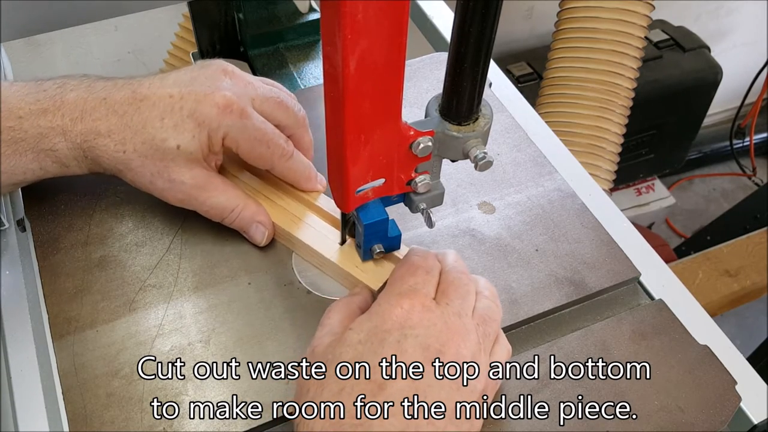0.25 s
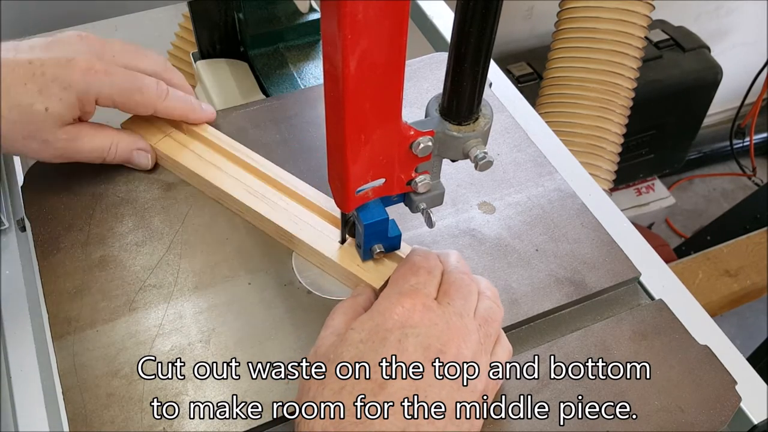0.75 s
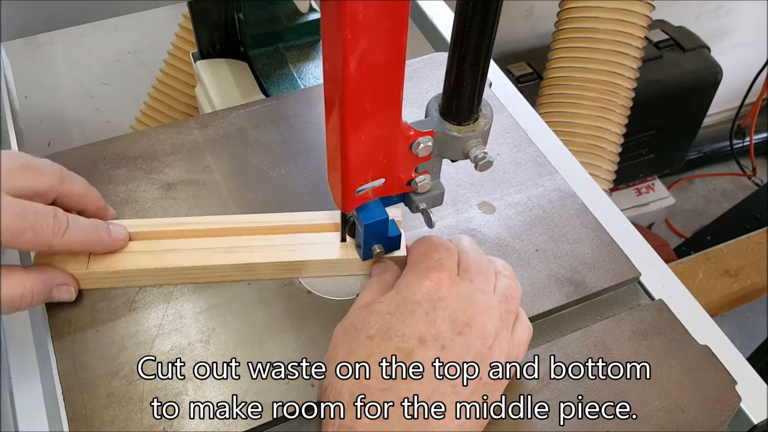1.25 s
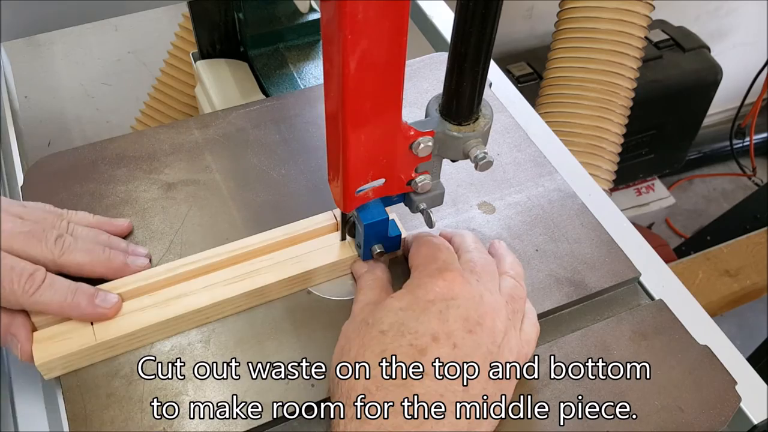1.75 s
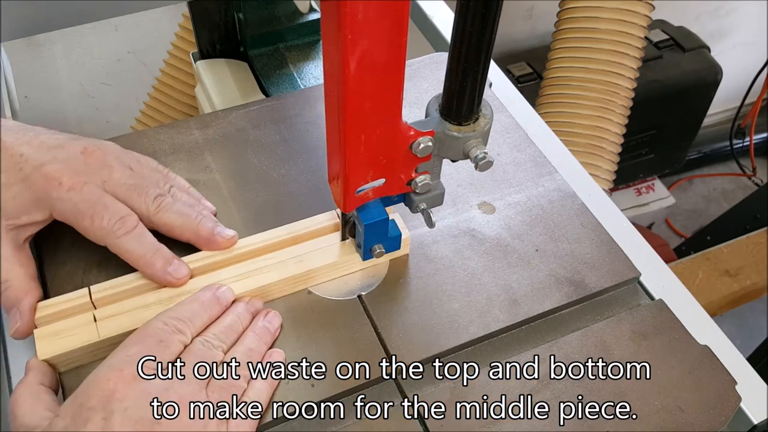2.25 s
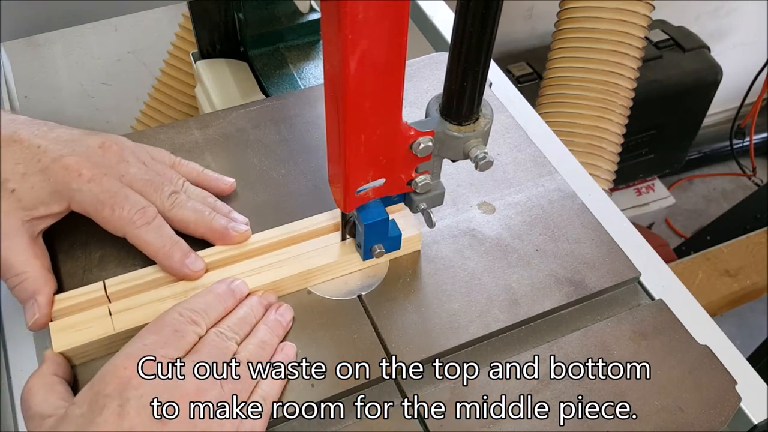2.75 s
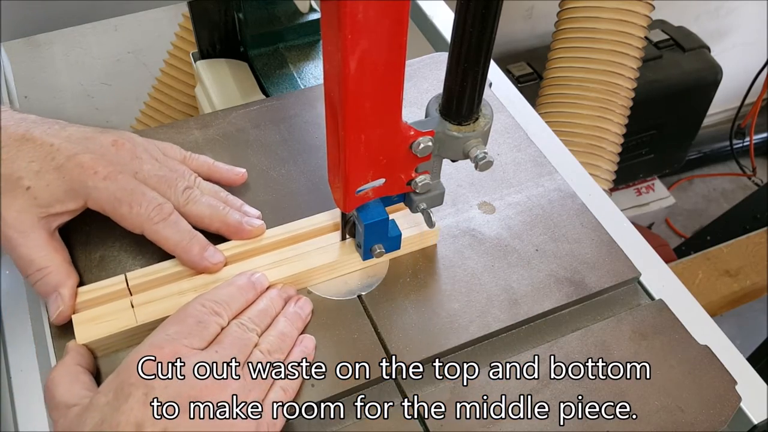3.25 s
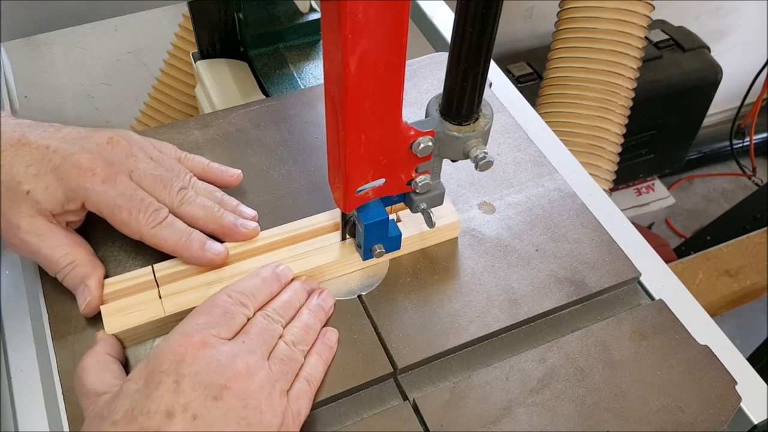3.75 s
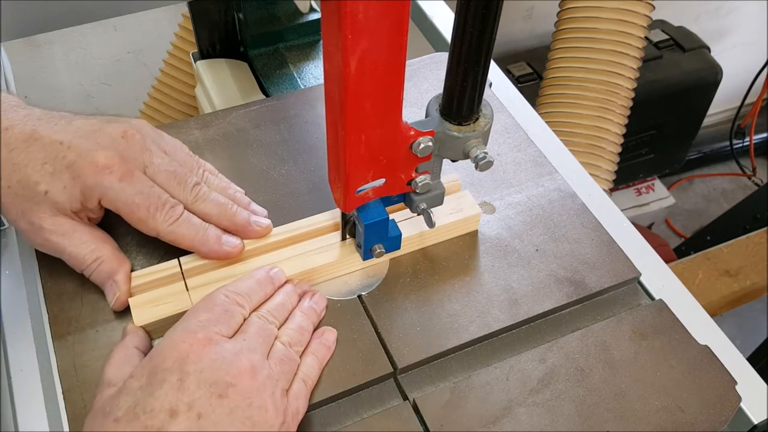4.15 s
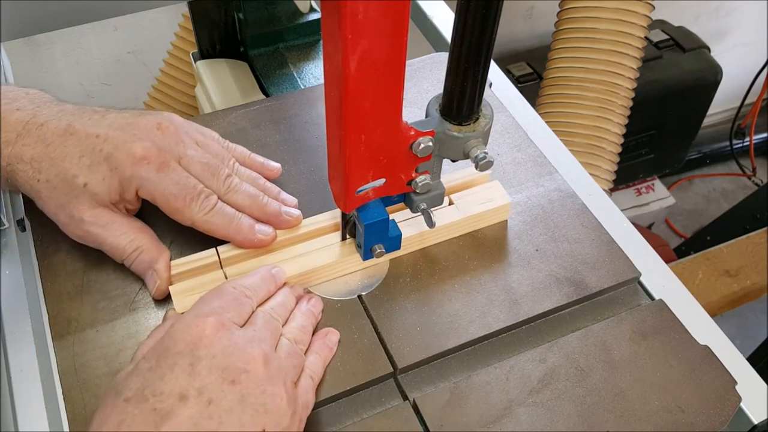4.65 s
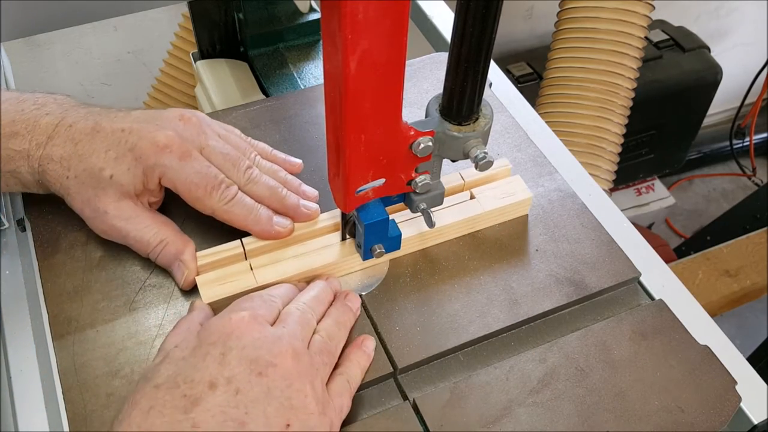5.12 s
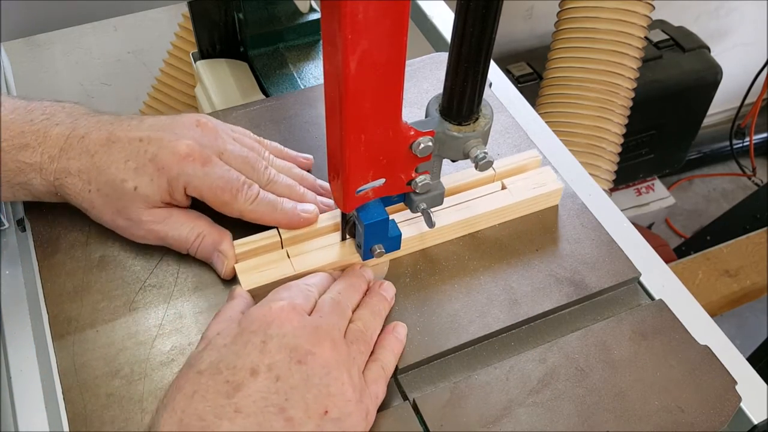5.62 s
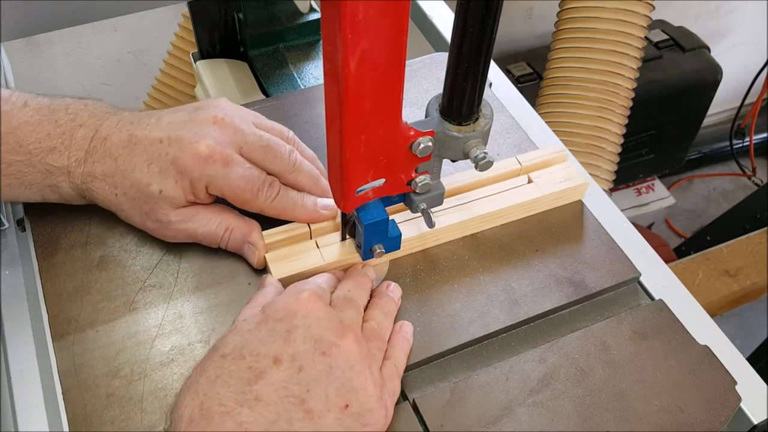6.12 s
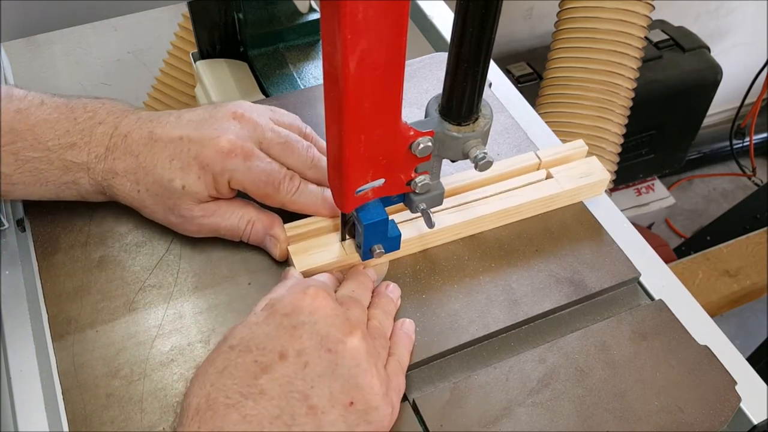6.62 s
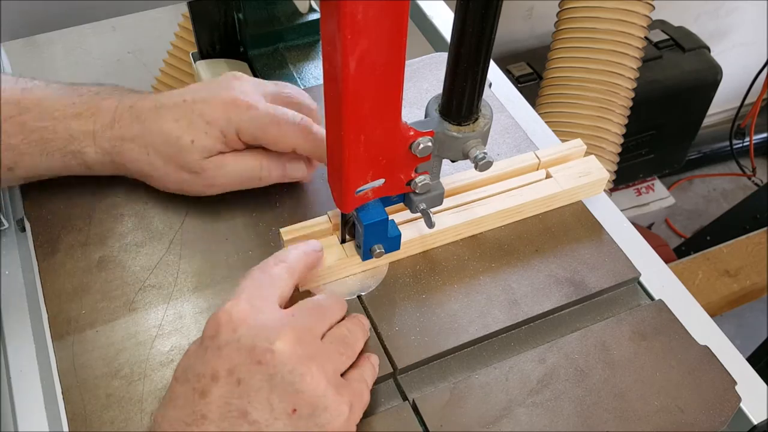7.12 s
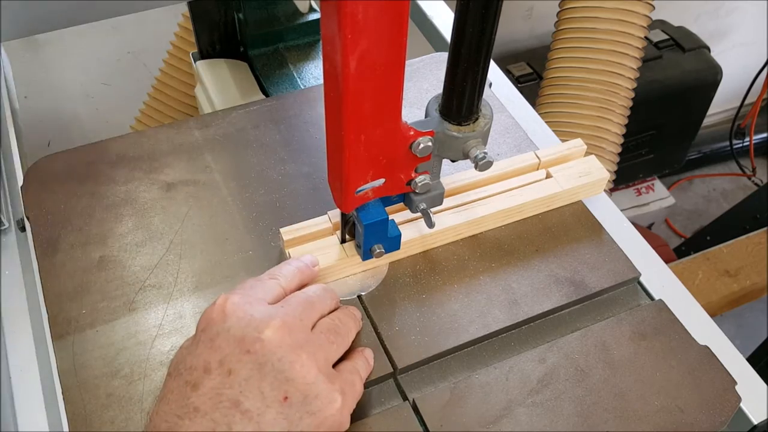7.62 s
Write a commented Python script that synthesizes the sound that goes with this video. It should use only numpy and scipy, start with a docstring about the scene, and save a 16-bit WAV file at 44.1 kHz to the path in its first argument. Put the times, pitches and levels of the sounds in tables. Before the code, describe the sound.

A bandsaw whirs steadily in a small workshop, heard from close by. Short whines and ticks come as a strip of wood is nudged against the blade. A long rasping cut follows, with a thin, throbbing whine and high pulsing squeals where the wood pinches the blade. The rasp and whine stop when the cut ends, and the saw keeps running with a faint metallic ring.

```python
"""A bandsaw whirs in a small workshop, with short whines and ticks as a strip of wood is lined up.
A long rasping cut follows, then the saw runs free. Wheels, belt and air stir the frame throughout.
Wood pressed on the blade makes it whine at multiples of the tooth rate and sets a guide bearing singing.
The teeth tear the fibres, throbbing with the wheels, and the blade squeals where the kerf pinches it."""
import sys
import numpy as np
from scipy import signal
from scipy.fft import rfft, irfft, next_fast_len
from scipy.io import wavfile
from scipy.ndimage import uniform_filter1d

SR = 44100
rng = np.random.default_rng(int(sys.argv[2]) if len(sys.argv) > 2 else 0)


def wav_out(sig):
    """Save sig, one row per channel (or a flat mono array), as 16-bit PCM at SR to the path in sys.argv[1]."""
    wavfile.write(sys.argv[1], SR, np.round(np.clip(np.atleast_2d(sig).T, -1, 1) * 32767).astype(np.int16))


N = 347508
T = np.arange(N) / SR
HZ = np.fft.rfftfreq(2 * next_fast_len(N // 2 + 1), 1 / SR)
TOOTH_HZ = 501.3  # unloaded
MOTOR_HZ, WHEEL_HZ, ROLLER_HZ, BLADE_LOOP_HZ = 29.22, 14.55, 31.57, 2.43  # turning rates
CUT_START_S, CUT_END_S = 2.16, 6.63


def amp(db):
    """Decibels to gain."""
    return np.exp(np.asarray(db) * np.log(10) / 20)


def unit(x):
    """Scale to rms 1."""
    return x / np.sqrt(np.mean(x ** 2) + 1e-20)


def curve(rows):
    """(s, value) rows read at every sample."""
    return np.interp(T, *np.transpose(rows))


def spectrum(rows):
    """(Hz, value) rows read on a log frequency axis."""
    hz, value = np.transpose(rows)
    return np.interp(np.log(HZ + 1), np.log(hz + 1), value)


def bell(hz, width_hz):
    """Resonance curve, peak 1."""
    return 1 / (1 + (2 * (HZ - hz) / width_hz) ** 2)


def stretch(slow):
    """Spread a slowly sampled signal over the scene."""
    return np.interp(T, np.linspace(0, T[-1], len(slow)), slow)


def drift(rate_hz, count=16384):
    """Random wander up to about rate_hz, rms 1."""
    hz = np.fft.rfftfreq(count, T[-1] / count)
    slow = irfft(rfft(rng.standard_normal(count)) * np.exp(-(hz / rate_hz) ** 2))
    return stretch(unit(slow))


def cycle(hz):
    """Swing of a part turning at slightly uneven speed."""
    return np.sin(2 * np.pi * (hz * T + 0.1 * drift(2.3)))


def ripple(grain_hz):
    """Random unevenness over frequency, rms 1."""
    knots = np.arange(0, SR, grain_hz)
    return unit(np.interp(HZ, knots, rng.standard_normal(len(knots))))


def swell(start_s, end_s, attack_s, release_s):
    """Linear rise, hold until end_s, exponential decay."""
    return np.clip((T - start_s) / attack_s, 0, 1) * np.exp(-np.clip((T - end_s) / release_s, 0, 20))


def contacts(rows, attack_s, release_s):
    """Gain of a series of touches; the firmest counts."""
    return np.max([amp(db) * swell(start, end, attack_s, release_s) for start, end, db in rows], axis=0)


def noise(gain):
    """Coloured stereo noise, rms 1; table reflections turn the treble's phase between channels."""
    # Each row: frequency in Hz, left-right coherence.
    coherence = [(30, .5), (80, 0.4), (160, 0.87), (400, 0.87), (700, 0.94), (1200, 0.87), (2500, 0.53),
                 (5000, 0.55), (9000, 0.5), (14000, 0.5)]
    # Each row: frequency in Hz, left minus right in dB.
    balance = [(60, 0.5), (110, 0), (200, -0.5), (380, -0.5), (700, -1), (1290, 3.5), (2380, -1.5),
               (4400, 0), (8120, 1), (15000, 1)]
    # Each row: frequency in Hz, left-right phase spread in radians.
    phase_spread = [(600, .05), (1500, .4), (2500, 1.), (5000, 1.1), (9000, 1.7), (14000, 2.1)]
    common, separate = rng.standard_normal((2, 2 * len(HZ))).view(complex)
    same, pan = spectrum(coherence), amp(spectrum(balance) / 2)
    turn = np.exp(1j * spectrum(phase_spread) * ripple(grain_hz=256.1))
    right = same * common * turn + np.sqrt(1 - same ** 2) * separate
    return unit(irfft(gain * np.array([common * pan, right / pan]))[:, :N])


def ringing(modes):
    """Noise in a few resonances (Hz, width Hz, relative dB), rms 1."""
    return noise(sum(amp(db) * bell(hz, width) for hz, width, db in modes))


def body(shape, modes):
    """Broad spectrum with resonances and notches; the thin steel's small modes roughen the treble."""
    # Table echo cancels the direct sound. Each row: centre in Hz, width in Hz, gain in dB.
    notches = [(510, 25, -3), (3240, 130, -2), (3850, 120, -2), (5130, 170, -1.5), (5920, 130, -2),
               (6240, 180, -2.8), (6740, 110, -2.5), (7080, 160, -3.7), (8190, 100, -2), (9740, 170, -3)]
    small_modes_db = 1.3 * ripple(grain_hz=50) * np.clip(HZ / 2000 - .6, 0, 1)
    modes_db = sum(db * bell(hz, width) for hz, width, db in modes + notches)
    return amp(spectrum(shape) + small_modes_db + modes_db)


def tone(hz, scatter, width_hz, lead_rad=0., left_db=0., count=4096):
    """Stereo tone plus a noise halo per channel; scatter is the halo-to-tone ratio."""
    phase = 2 * np.pi * (np.cumsum(hz * np.ones(N)) / SR + rng.random())
    cos, sin = np.cos(phase), np.sin(phase)
    offset_hz = np.fft.fftfreq(count, T[-1] / count)
    white = rng.standard_normal((2, count, 2)) @ [1, 1j]
    halo = np.fft.ifft(np.fft.fft(white) / (1 + (offset_hz / width_hz) ** 2))
    sides = np.array([[.5], [-.5]])
    envelope = (np.exp(1j * lead_rad * sides) + scatter * halo / halo.std()) * amp(left_db * sides)
    envelope /= np.sqrt(np.mean(abs(envelope) ** 2) / 2)
    return np.array([stretch(side.real) * cos - stretch(side.imag) * sin for side in envelope])


def whir(load, press):
    """Wheels, belt and air stir the frame; load and wood held on the blade damp it."""
    # Each row: frequency in Hz, relative density in dB.
    shape = [(20, -23), (65, -47), (120, -33), (170, -18.5), (300, -17), (600, -13.5), (1000, 0), (1230, 0),
             (1345, -4), (1420, -1), (1510, -13.5), (1660, -9), (4400, -10.5), (6200, -13), (10300, -14),
             (11400, -17.5), (15600, -20)]
    # Frame, table and blade resonances. Each row: centre in Hz, width in Hz, boost in dB.
    modes = [(235, 10, 6.6), (326, 70, 10.9), (453, 66, 12), (541, 30, 9), (611, 50, 14), (679, 67, 10.2),
             (759, 23, 7.8), (822, 30, 11.6), (950, 45, 5.5), (1040, 40, 2.5), (1150, 35, 3.6),
             (1635, 35, 3.5), (1921, 14, 5), (2172, 66, 11.5), (2272, 44, 8.6), (2406, 60, 7.5),
             (2565, 40, 2.5), (2633, 18, 6.5), (2825, 10, 11.3), (3015, 66, 4.4), (3565, 130, 3.5),
             (4040, 150, 4), (4400, 160, 3), (4680, 220, 3.5), (5619, 149, 7), (6490, 178, 7.3),
             (6894, 58, 4.7), (7300, 90, 2), (8436, 64, 4.1)]
    held = np.clip(press / amp(-43.5), 0, 1)
    return noise(body(shape, modes)) * amp(-43 - 1.7 * load - held + 0.66 * drift(27))


def motor_hum(gain_db=1.9):
    """Faint steady motor tones."""
    # Each row: frequency in Hz, relative level in dB.
    tones = [(1412, -61), (1441, -63.5), (2153, -70), (2824, -71), (2632, -75)]
    return sum(amp(db + gain_db) * tone(hz, scatter=0.98, width_hz=2.4) for hz, db in tones)


def free_ring():
    """The blade rings while it runs free."""
    # Each row: centre in Hz, width in Hz, relative level in dB.
    modes = [(2170, 70, -6), (2285, 50, -12), (2410, 70, -12), (4400, 350, -8), (5635, 90, -6.5),
             (9435, 60, 0), (9920, 50, -5), (10410, 90, -3), (12450, 140, -7)]
    # Each row: time in seconds, level in dB.
    level = [(0, -54), (.55, -68.5), (.7, -56), (1, -62), (1.1, -65), (6.6, -78), (6.72, -53.5),
             (7.55, -52.5), (7.7, -59), (7.88, -60)]
    return ringing(modes) * amp(curve(level))


def nudges():
    """Short pushes of the blade's back onto its guide bearing."""
    # Each row: start in seconds, end in seconds, level in dB.
    pushes = [(-.02, .05, -60.5), (.1, .35, -60), (.54, .62, -61), (1.02, 1.06, -56), (1.16, 1.23, -53.5),
              (1.31, 1.35, -60.5), (1.74, 1.83, -55.5), (1.86, 1.93, -54.5), (1.97, 2.08, -57)]
    return contacts(pushes, attack_s=0.012, release_s=0.045)


def bearing(speed, roller, nudge, load, sing_hz=4563, race_hz=190, cage_hz=102):
    """The guide bearing sings, throbbing as it rolls; nudges bend it flat, load damps its octave."""
    # During the cut. Each row: time in seconds, relative dB of harmonic 1, relative dB of harmonic 3.
    singing = [(2.2, -54.5, -55), (2.75, -52, -53), (3.5, -53.5, -51), (4.3, -52.5, -47.5),
               (5.0, -57, -50.5), (5.4, -56, -50.5), (5.75, -51.5, -50), (6.1, -53.5, -49.5),
               (6.62, -64, -50.5)]
    pitch_hz = sing_hz * speed * (1 + .0003 * drift(30) - .004 * nudge / nudge.max())
    sway_hz = 9 * cycle(WHEEL_HZ) + 8 * cycle(ROLLER_HZ) + 6 * drift(70)
    cutting = swell(CUT_START_S, CUT_END_S, attack_s=0.056, release_s=0.044)
    first, third = (amp(curve(np.array(singing)[:, [0, k]])) * cutting for k in (1, 2))
    octave = first * amp(-7.5 * load)
    rough = nudge * amp(2 * drift(83))
    harmonics = [(first, .5, 1.5, 3.6), (octave, -3, -2, 2), (third, -.5, -4, 1.5)]
    levels = [(amp(cut_db) * steady + amp(nudge_db) * rough) * amp(throb_db * roller)
              for steady, cut_db, nudge_db, throb_db in harmonics]
    rattle = amp(-7.5 + 2.5 * drift(120)) * levels[0] * ringing([(4480, 300, 0)])
    song = sum(level * tone(k * pitch_hz + sway_hz / k, scatter=.3, width_hz=18 + 6 * k,
                            lead_rad=.45 * k, left_db=2.2 - 2 * k) for k, level in enumerate(levels, 1))
    flutter = (1 - load) * cycle(race_hz) + load * cycle(cage_hz)
    return (rattle + song) * (1 + 0.13 * flutter)


def wood_feed(nudge, idle_db=-60.5):
    """Drive of the kerf sounds: power sum of the cut, the nudges and an idle floor."""
    # Each row: time in seconds, feed level in dB.
    level = [(2.2, -55), (2.38, -53), (2.48, -49.5), (2.75, -48), (3.4, -49.5), (4.3, -49), (5.5, -49.5),
             (6.2, -51), (6.62, -52.5)]
    cutting = amp(curve(level)) * swell(CUT_START_S, CUT_END_S, attack_s=0.082, release_s=0.038)
    return np.sqrt(cutting ** 2 + nudge ** 2 + amp(idle_db) ** 2)


def rasp(feed, roller, wheel, loop):
    """Teeth catch on the wood and tear its fibres; uneven teeth come round once a blade loop."""
    # Single catches. Each row: start in seconds, level in dB, decay in seconds.
    snags = [(.01, -48, 0.024), (1.04, -55.5, 0.047), (1.168, -59, 0.036), (1.738, -45, 0.016),
             (6.622, -48, 0.04), (6.735, -47, 0.012)]
    # Each row: frequency in Hz, relative density in dB.
    shape = [(100, -48), (1500, -4), (3200, -4), (4000, 1), (4850, 3.5), (5200, 1), (6100, -1.5),
             (7400, -2), (8150, 0), (8700, -.5), (9800, -2), (11600, -4.5), (12300, -2), (13100, 3),
             (13700, 2.5), (14400, -7), (15600, -8)]
    # Blade resonances in the kerf. Each row: centre in Hz, width in Hz, boost in dB.
    modes = [(2600, 130, 3), (3460, 160, 3.5), (4165, 60, 6), (4255, 55, 7), (4410, 60, 5.5), (4720, 80, 8),
             (4870, 50, 2.5), (5520, 130, 5.5), (5700, 90, 5), (6560, 130, 5), (8050, 80, 7),
             (8790, 130, 5), (9465, 130, 6), (10420, 160, 5), (13400, 90, 5)]
    catches = sum(amp(db) * swell(start, start, 0.0084, decay) for start, db, decay in snags)
    throb_db = -0.13 * roller + 0.25 * wheel + 0.25 * cycle(2 * MOTOR_HZ) + 0.59 * loop
    tearing = amp(4.5 + throb_db + 1.36 * drift(240))
    return noise(body(shape, modes)) * (feed * tearing + catches)


def teeth(speed, load, press, graze=0.39):
    """Teeth tick past the wood and the rubbed blade flank rings, until the wood is through."""
    # Each row: tooth-rate multiple, relative dB at first touch, with the strip turned, in a tight kerf.
    harmonics = [(3, -58, -58, -55), (6, -73, -66, -63.5), (8, -71, -77, -65), (11, -59, -77, -68),
                 (16, -58, -60.5, -75), (19, -80, -64, -90), (20, -58, -84, -83), (21, -58, -57.5, -73),
                 (22, -85, -73, -54), (25, -63, -61, -77), (27, -62, -83, -69)]
    # Each row: time in seconds, kerf tightness from 0 to 1.
    tightness = [(2.3, 0), (2.55, .2), (2.8, .65), (4.1, .8), (4.45, 1), (5.6, 1), (5.9, .72), (6.25, .68),
                 (6.45, .3)]
    # Each row: centre in Hz, width in Hz, relative level in dB.
    flank_modes = [(5500, 70, -4), (5640, 90, -3), (6560, 110, 0), (6870, 50, -3), (13060, 100, -7)]
    turned, grip = np.clip((T - .7) / 0.4, 0, 1), curve(tightness)
    firmness = np.clip(press / amp(-44) + load, 0, 1)
    touch = (graze + (1 - graze) * firmness) * swell(0, CUT_END_S, attack_s=0.07, release_s=0.037)
    out = ringing(flank_modes) * amp(-56.5 - 26 * load)
    for k, first_db, turned_db, tight_db in harmonics:
        brush_db = first_db + (turned_db - first_db) * turned
        level = amp(brush_db + (tight_db - brush_db) * grip - 1.5)
        out += level * tone(k * TOOTH_HZ * speed, scatter=0.85, width_hz=35)
    return out * touch


def side_pressure(linger_s=.105):
    """Hands lean the wood on the blade: short touches, and a long push that just outlasts the cut."""
    # Each row: start in seconds, end in seconds, level in dB.
    leans = [(.03, .13, -50), (.11, .57, -46.5), (1.08, 1.27, -46), (1.32, 1.59, -46), (1.68, 1.79, -52),
             (1.77, 1.87, -46), (1.86, 1.97, -44.5), (2.06, 2.18, -45.5), (7.19, 7.26, -53)]
    # Each row: time in seconds, level in dB.
    push = [(2.3, -44), (2.5, -46), (2.9, -47.5), (3.75, -47.5), (4.47, -50), (4.93, -46.5), (5.2, -49.5),
            (5.88, -47), (6.02, -50.5), (6.35, -48), (6.7, -47)]
    cutting = amp(curve(push)) * swell(CUT_START_S, CUT_END_S + linger_s, attack_s=0.12, release_s=0.04)
    leaning = contacts(leans, attack_s=0.05, release_s=0.042)
    return np.maximum(leaning, cutting) * amp(0.36 * drift(2.5))


def whine(speed, press):
    """The pressed blade whines at the tooth rate and its octave; its guide hums in beating pairs."""
    # Each row: tooth-rate multiple, relative level in dB.
    harmonics = [(1, -23), (2, 2)]
    # Each row: unloaded frequency in Hz, relative level in dB.
    guide_tones = [(552.1, -17), (557.6, -13), (1116, -15), (1380.3, -20), (1394.9, -14), (2641, -23.5)]
    blade = sum(amp(db) * tone(k * TOOTH_HZ * speed, scatter=0.031, width_hz=9, lead_rad=0.48, left_db=2)
                for k, db in harmonics)
    guide = sum(amp(db) * tone(hz * speed, scatter=0.25, width_hz=4.3, left_db=1.5)
                for hz, db in guide_tones)
    return press * (1 + 0.11 * drift(28)) * (amp(-0.07) * blade + amp(0.8) * guide)


def scrape(drive, motor, loop):
    """Deep-biting teeth scrape the kerf walls: a juddering, slowly sinking note under a sizzle."""
    # Each row: time in seconds, pitch in Hz.
    pitch = [(2.5, 8560), (3.0, 8680), (3.7, 8490), (4.8, 8510), (5.8, 8470), (6.2, 8380)]
    judder_db = 2.8 * loop + 2.8 * motor + 2.6 * drift(14)
    note = tone(curve(pitch) + 60 * drift(22), scatter=4, width_hz=120) * amp(-5.5 + judder_db)
    sizzle = ringing([(12800, 380, 2), (13100, 560, -9)]) * amp(-12 + 0.6 * judder_db)
    return drive * (note + sizzle)


def chatter(bite):
    """Two lower blade notes swell early in the cut."""
    # Each row: centre in Hz, width in Hz, relative level in dB.
    modes = [(2640, 150, -5), (5530, 270, 0.5)]
    # Each row: time in seconds, level at full bite in dB.
    level = [(2.4, -61), (2.85, -55), (3.15, -52), (3.55, -51), (3.9, -58.5), (4.3, -75)]
    return ringing(modes) * bite * amp(curve(level))


def squeal(roller, motor, wheel):
    """The kerf pinches the blade, which squeals in pulses with the turning parts."""
    # Each row: start in seconds, end in seconds, relative level in dB, pitch in Hz.
    pinches = [(2.65, 3.25, -61, 13130), (3.25, 3.85, -56.5, 13170), (3.83, 4.2, -55, 13125),
               (4.16, 4.8, -52, 13085), (4.94, 5.62, -51.5, 13060), (5.68, 5.88, -60, 13150),
               (5.97, 6.43, -57, 13100)]
    out = 0
    for start, end, db, hz in pinches:
        note = tone(hz * (1 + 0.0046 * wheel), scatter=1.8, width_hz=84, left_db=-6.5)
        out += amp(db) * swell(start, end, attack_s=0.069, release_s=0.067) * note
    return out * amp(6 + 1.6 * roller + 1.4 * motor + 2.2 * wheel)


def exit_ring(roller):
    """The blade rings lower near the end of the cut."""
    # Each row: centre in Hz, width in Hz, relative level in dB.
    modes = [(4270, 380, -3), (8320, 200, -1), (8570, 220, -7), (12600, 600, -12)]
    # Each row: time in seconds, mean level in dB.
    level = [(5.9, -75), (6.08, -47), (6.35, -51.5), (6.62, -50), (6.68, -79.5)]
    throb_db = 1.8 * roller + 1.2 * cycle(WHEEL_HZ) + 1.8 * drift(12)
    return ringing(modes) * amp(curve(level) + throb_db)


def scene(speed_sag=.0056, bury_s=0.92):
    """Machine, blade and kerf; load builds and slows the blade slightly as it buries itself."""
    press, nudge = side_pressure(), nudges()
    feed = wood_feed(nudge)
    bite = np.clip(uniform_filter1d(feed, size=8000) / amp(-49.5), 0, 1) ** 3
    load = swell(CUT_START_S, CUT_END_S, attack_s=bury_s, release_s=0.019) ** .6
    speed = 1 - speed_sag * load + 0.00026 * drift(6.33)
    roller, motor, wheel = cycle(ROLLER_HZ), cycle(MOTOR_HZ), cycle(WHEEL_HZ)
    loop = unit(sum(np.sin(2 * np.pi * (k * BLADE_LOOP_HZ * T + rng.random())) for k in range(1, 5)))
    machine = whir(load, press) + motor_hum() + free_ring()
    blade = bearing(speed, roller, nudge, load) + teeth(speed, load, press) + whine(speed, press)
    kerf = rasp(feed, roller, wheel, loop) + scrape(feed * bite, motor, loop) + chatter(bite)
    return machine + blade + kerf + squeal(roller, motor, wheel) + exit_ring(roller)


def record(dry, cutoff_hz=15760):
    """Steep low-pass."""
    taps = signal.firwin(1023, cutoff_hz, window=("kaiser", 9), fs=SR)
    return signal.oaconvolve(dry, taps[None], "same")


dry = scene()
out = record(dry)
wav_out(out)
```